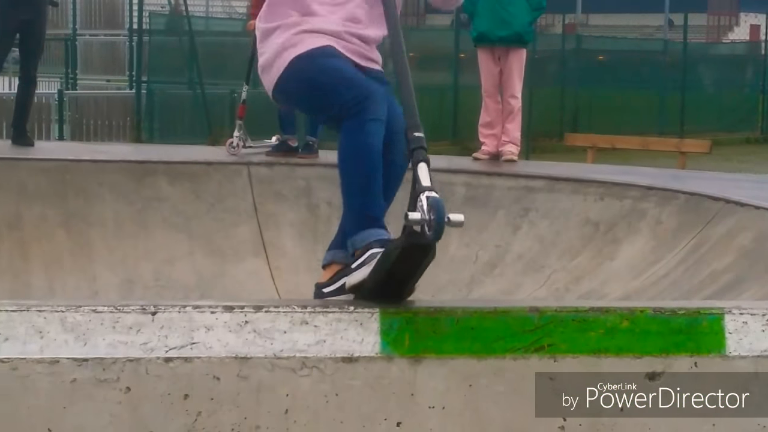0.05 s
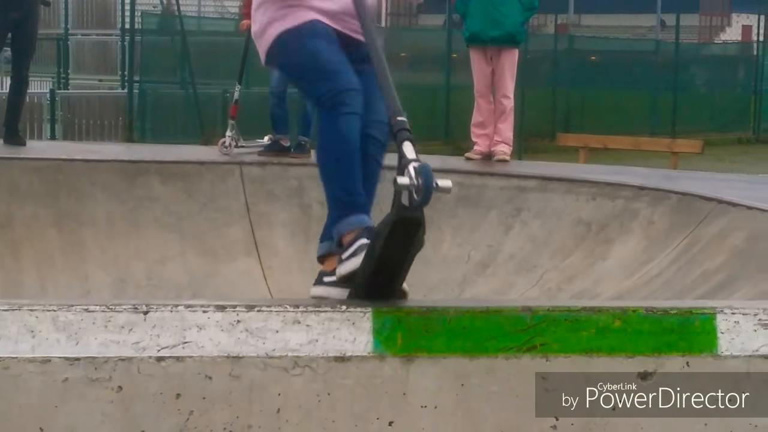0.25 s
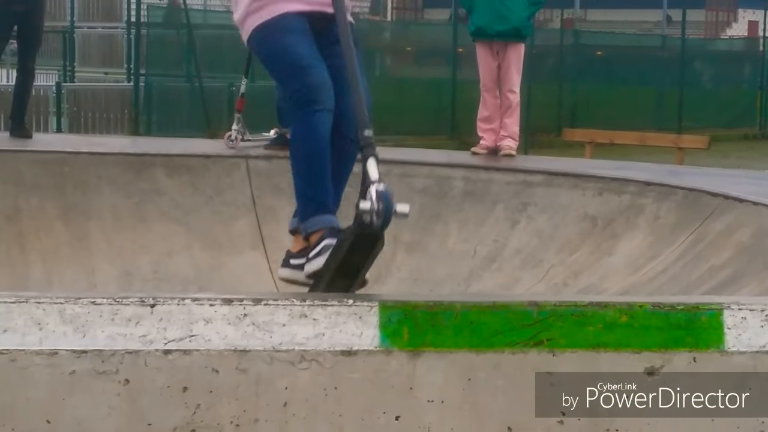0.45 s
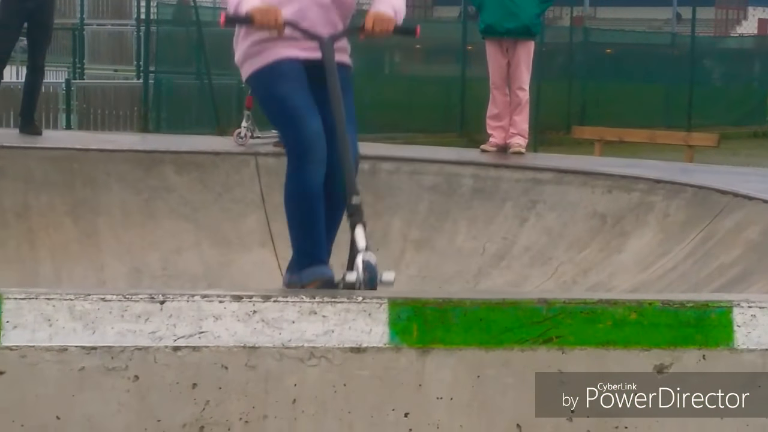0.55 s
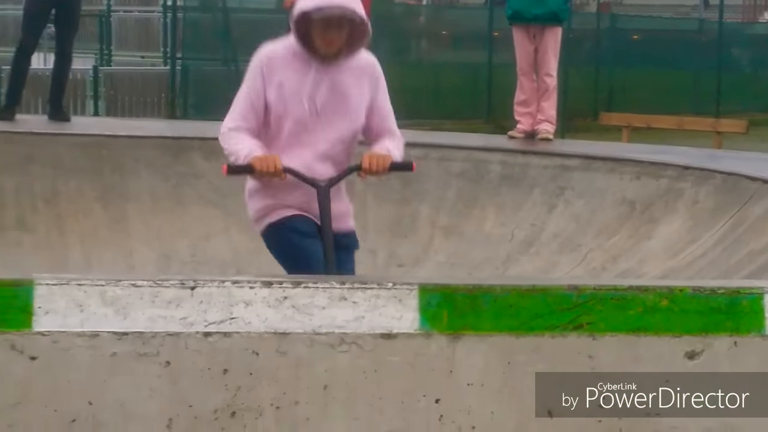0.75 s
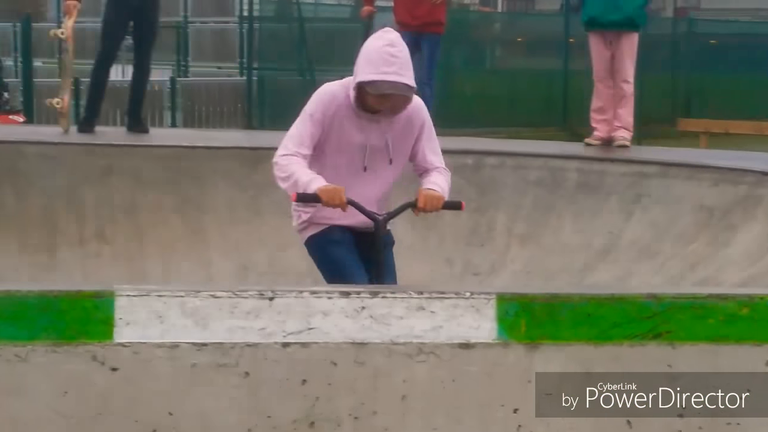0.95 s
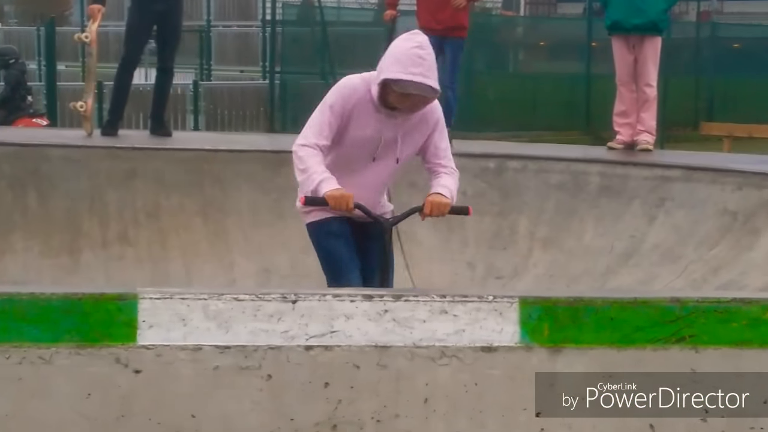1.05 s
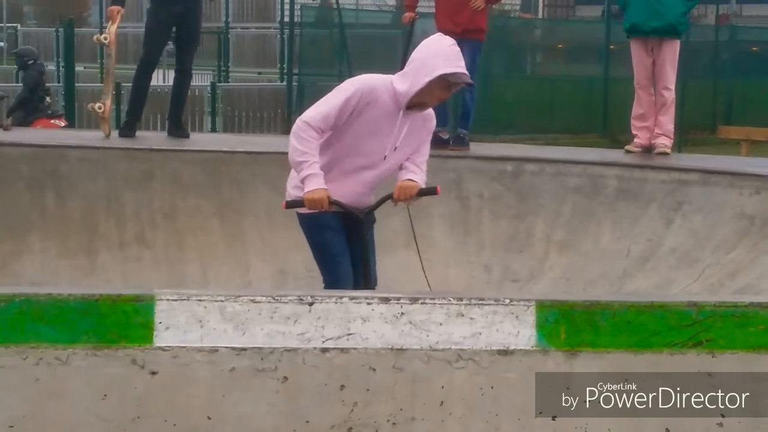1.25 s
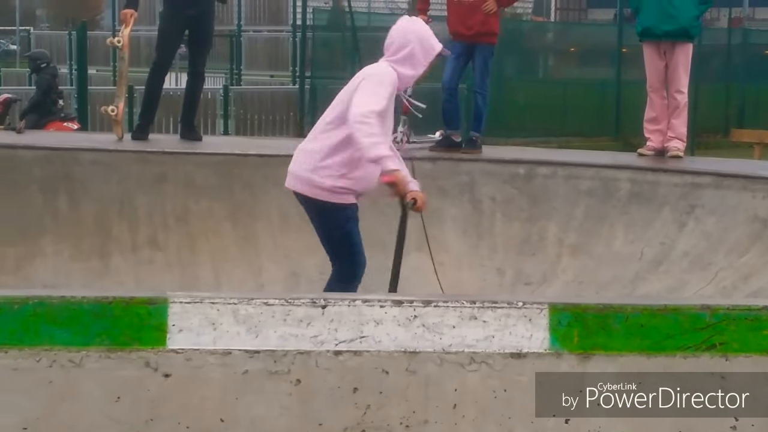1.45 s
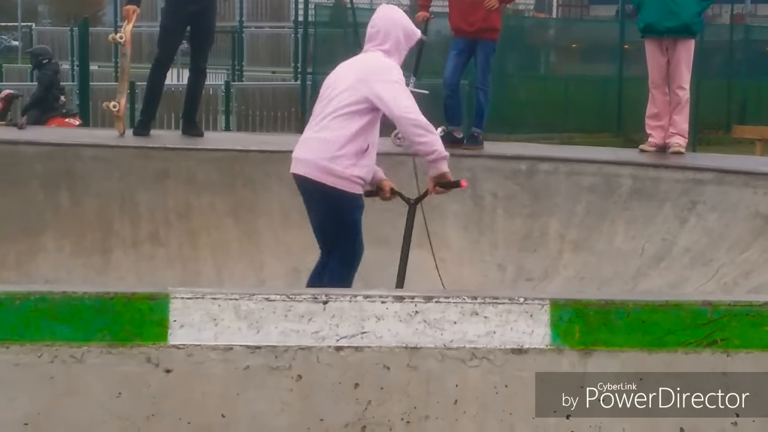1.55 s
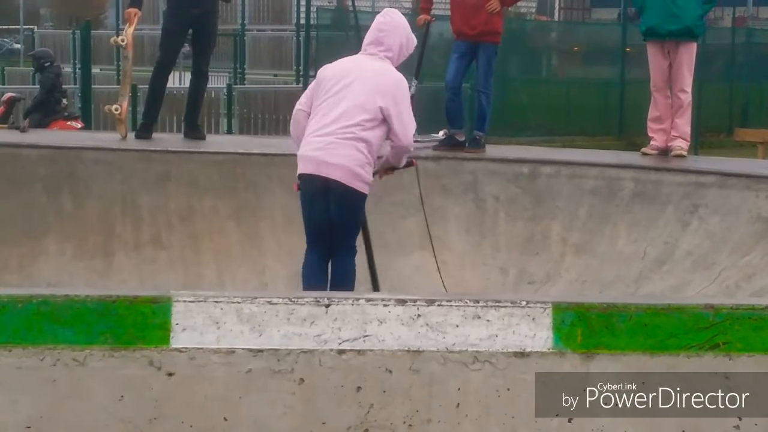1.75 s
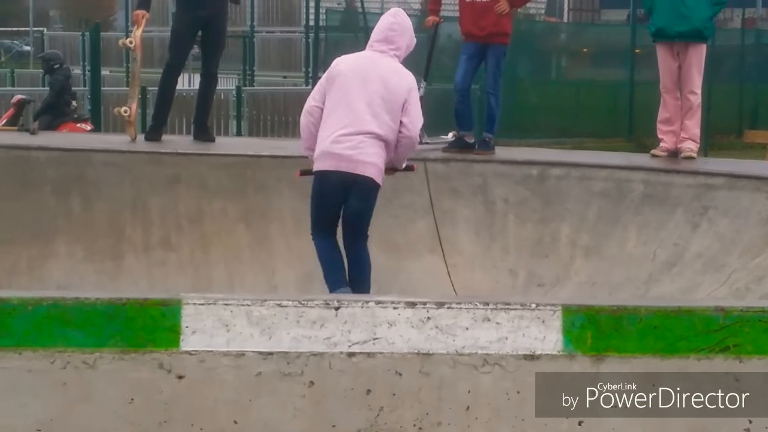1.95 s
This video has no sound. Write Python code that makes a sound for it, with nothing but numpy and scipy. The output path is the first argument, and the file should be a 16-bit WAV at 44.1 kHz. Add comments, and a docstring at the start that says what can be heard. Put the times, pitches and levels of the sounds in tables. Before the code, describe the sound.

One sharp metallic scooter landing on skatepark concrete, followed by faint rolling and lighter knocks.

```python
"""A stunt scooter slaps down on the concrete of a skatepark bowl: the deck clacks, then the front wheel.
Each blow makes the metal ring, thumps through the wheels and crunches on grit; the ramps throw it back.
The scooter rolls away, its hard wheels rumbling and hissing, with a few dull thuds, thin squeaks and
one last light clack. Faint outdoor noise lies under it all."""
import sys
import numpy as np
from scipy import signal
from scipy.fft import rfft, irfft
from scipy.io import wavfile

SR = 44100
rng = np.random.default_rng(int(sys.argv[2]) if len(sys.argv) > 2 else 0)


def generate_wav(sig):
    """Save sig (samples, or channels by samples) to the path in sys.argv[1] as 16-bit PCM at SR."""
    pcm = np.round(np.clip(np.atleast_2d(sig).T, -1, 1) * 32767).astype(np.int16)
    wavfile.write(sys.argv[1], SR, pcm)


N = 88200
T = np.arange(N) / SR

# the scooter hits concrete (a "fade" is the time a sound takes to fall by 60 dB):
# t/s, deck level/dB, fork level/dB, thump level/dB, crunch level/dB, crunch fade/s
BLOWS = [(0.2217, 4.5, -6.5, -22.5, -21.5, 0.16), (0.2946, -33, -12, -42.5, -20.5, 0.034),
         (0.349, -66.5, -62.5, -56.5, -36.5, 0.026), (0.9154, -74, -75, -53, -51, .09),
         (0.983, -64.5, -69, -65, -56, 0.093), (1.075, -54.5, -81, -89, -75, 0.044),
         (1.1461, -73.5, -73, -73, -45.5, 0.0054), (1.871, -52.5, -51.5, -72, -47.5, 0.025),
         (1.8903, -65.5, -77, -45.5, -31.5, 0.024)]


def from_db(db):
    """Turn decibels into a number to multiply by."""
    return 10 ** (np.asarray(db) / 20)


def unit_level(x):
    """Scale a sound to an average (rms) strength of 1."""
    return x / np.sqrt(np.mean(x ** 2) + 1e-20)


def coloured(x, curve):
    """Turn pitches up or down along a curve of f/Hz, level/dB."""
    hz, db = np.transpose(curve)
    size = 2 * N
    freqs = np.fft.rfftfreq(size, 1 / SR)
    gain = from_db(np.interp(np.log(freqs + 1e-9), np.log(hz), db))
    # fold the filter forward in time so that nothing sounds early
    folded = irfft(np.log(gain))
    folded[1:N] *= 2
    folded[N + 1:] = 0
    return irfft(rfft(x, size) * np.exp(rfft(folded)))[..., :N]


def low_pass(x, hz):
    """Gently cut the treble."""
    return signal.sosfilt(signal.butter(2, min(hz, SR / 2 - 100), fs=SR, output="sos"), x + 1e-18)


def high_pass(x, hz):
    """Gently cut the bass."""
    return signal.sosfilt(signal.butter(2, hz, "high", fs=SR, output="sos"), x + 1e-18)


def delayed(x, seconds):
    """The same sound, a little later."""
    freqs = np.fft.rfftfreq(2 * N, 1 / SR)
    return irfft(rfft(x, 2 * N) * np.exp(-2j * np.pi * freqs * seconds))[:N]


def rising(start, rise):
    """A loudness curve that builds up from 0 to 1."""
    return 1 - np.exp(-np.maximum(T - start, 0) / rise)


def dying(start, fade):
    """A loudness curve that jumps to 1, then falls 60 dB in `fade` seconds."""
    return (T >= start) * np.exp(-np.log(1000) * np.maximum(T - start, 0) / fade)


def drift(hz):
    """A random wobble of about 1 up or down, mostly slower than `hz`."""
    return unit_level(low_pass(rng.standard_normal(N + SR), hz)[SR:])


def stereo_noise(curve, alike):
    """Shaped noise; `alike`, from 0 to 1, is how much both ears share."""
    mid, side = rng.standard_normal((2, N))
    pair = np.sqrt(1 + alike) * mid + np.sqrt(1 - alike) * np.array([side, -side])
    return unit_level(coloured(pair, curve))


def struck(tones, times, levels_db):
    """Each knock sets a part's own tones ringing; neighbouring tones swing opposite ways."""
    knocks = np.zeros(N)
    knocks[(times * SR).astype(int)] = from_db(levels_db)
    ring = sum((-1) ** k * from_db(db) * np.sin(2 * np.pi * hz * T) * dying(0, fade)
               for k, (hz, db, fade) in enumerate(tones))
    return signal.fftconvolve(knocks, ring)[:N]


def open_air():
    """A faint, steady outdoor hush."""
    # tone of the hush: f/Hz, level/dB
    hush = [(100, -0.5), (400, -4.5), (700, -9), (1200, -2.5), (2500, -16), (6000, -18.5), (15000, -33)]
    return from_db(-76) * stereo_noise(hush, alike=0.4)


def park_echo(x):
    """The bowl scatters the sound, a long faint tail follows, and far walls send a late echo."""
    # washes of echo: delay/s, build-up/s, fade/s, level/dB, bass edge/Hz, treble edge/Hz
    washes = [(.006, 0.0015, 0.25, -15.5, 60, 15000), (0.029, 0.11, 1.4, -31.5, 1600, 2301),
              (0.168, 0.1, 0.27, -29, 1480, 2720)]
    echo = 0
    for delay, rise, fade, db, bass_hz, treble_hz in washes:
        shape = dying(delay, fade) * rising(delay, rise)
        scatter = rng.standard_normal((2, N)) * shape / np.linalg.norm(shape)
        dulled = low_pass(low_pass(scatter, treble_hz), treble_hz)
        echo = echo + from_db(db) * high_pass(high_pass(dulled, bass_hz), bass_hz)
    return signal.fftconvolve(x[None], echo, axes=1)[:, :N]


def ramp_echoes(x):
    """The ramps throw back quick, duller copies that weaken as the scooter rolls away."""
    # bounces off the ramps: delay/s, level/dB
    bounces = [(.00862, -16), (.01637, -8), (.02329, -14), (.0365, -29), (.0427, -23)]
    since_landing = np.maximum(T - BLOWS[0][0], 0)
    weakened = x * from_db(-5 * since_landing)  # 5 dB a second
    return low_pass(sum(from_db(db) * delayed(weakened, delay) for delay, db in bounces), hz=1900)


def rolling():
    """Hard wheels rumble and hiss unevenly over the concrete."""
    # loudness along the ride: t/s, rumble level/dB, hiss level/dB
    ride = [(0, -53.5, -64), (.2, -59.5, -66.5), (.45, -63.5, -69.5), (0.621, -66, -76), (0.848, -68, -78),
            (.96, -60.5, -72), (1.17, -68.5, -75.5), (1.349, -64, -70), (1.72, -59.5, -67.5),
            (1.85, -53, -64.5), (2, -56, -61.5)]
    # tone of the rumble: f/Hz, level/dB
    rumble_tone = [(20, -13), (45, -2), (120, -2), (200, -5), (350, -9.5), (500, -12.5), (900, -32),
                   (2000, -51)]
    # tone of the hiss: f/Hz, level/dB
    hiss_tone = [(300, -26.5), (600, -8), (950, -4), (1300, -6), (2400, -9), (3300, -8), (4500, -9.5),
                 (6200, -7.5), (8000, -13.5), (15000, -21)]
    times, rumble_db, hiss_db = np.transpose(ride)
    rumble_trim_db, hiss_trim_db, flicker_db = -3.5, 4, 1.5
    rumble = from_db(rumble_trim_db + np.interp(T, times, rumble_db) + flicker_db * drift(38))
    hiss = from_db(hiss_trim_db + np.interp(T, times, hiss_db) + flicker_db / 2 * drift(60))
    return rumble * stereo_noise(rumble_tone, alike=0.8) + hiss * stereo_noise(hiss_tone, alike=0.3)


def squeaks():
    """Thin whistles slide in pitch and tremble as they swell and fade."""
    # squeaks: t/s, length/s, start f/Hz, end f/Hz, level/dB, pitch wobble/Hz
    whistles = [(0.002, 0.075, 3840, 3940, -55.5, 70), (0.159, 0.087, 3730, 4100, -58, 80),
                (0.373, 0.039, 4000, 3970, -55.5, 109), (0.658, 0.031, 3044, 2930, -70, 115),
                (0.967, 0.21, 4500, 4480, -66.5, 150), (1.256, 0.043, 8760, 8380, -69, 220),
                (1.567, 0.035, 5700, 5780, -66.5, 120)]
    tremble_db = 3
    out = np.zeros(N)
    for start, length, start_hz, end_hz, db, wobble_hz in whistles:
        along = np.clip((T - start) / length, 0, 1)
        hz = start_hz + (end_hz - start_hz) * np.sin(np.pi / 2 * along) + wobble_hz * drift(250)
        loudness = from_db(db + tremble_db * drift(70)) * np.sin(np.pi * along)
        out += loudness * np.sin(2 * np.pi * np.cumsum(hz) / SR)
    return out


def thuds():
    """Wheels and feet bump softly: a few low swings with some dull grit."""
    # soft bumps: t/s, level/dB, f/Hz
    bumps = [(0.554, -51, 141), (0.670, -55.5, 87.9), (0.912, -39.5, 148), (0.914, -42.5, 352),
             (0.9216, -33.5, 252.3), (0.927, -45, 193), (0.949, -43, 260), (1.746, -55, 110),
             (1.806, -43.5, 235)]
    swings, grit_db = 10.6, -18
    out = np.zeros(N)
    for start, db, hz in bumps:
        grit = from_db(grit_db) * drift(hz)
        tone = np.sin(2 * np.pi * hz * (T - start))
        out += from_db(db) * dying(start, swings / hz) * (grit - tone)
    return out


def wheel_taps():
    """A wheel taps down lightly and rings for a moment."""
    # light taps: t/s, level/dB
    taps = [(1.8891, -49.5), (1.8928, -38)]
    # the wheel's ring: f/Hz, level/dB, fade/s
    wheel = [(792, 1, 0.017), (1370, 6, 0.011), (1726, -1, 0.03), (2624, -8, 0.023)]
    return struck(wheel, *np.transpose(taps))


def small_parts():
    """The steering tube, a loose clamp and the spring brake add thin, bright rings."""
    # the hardest blow jolts the tube: t/s, level/dB
    jolts = [(0.2228, -12.5)]
    # the tube's ring: f/Hz, level/dB, fade/s
    tube = [(2764, 0, 0.031), (2940, -1.5, .018), (5330, -10, .05), (6350, -12.5, .04)]
    # the clamp rattles afterwards: t/s, level/dB
    rattles = [(0.3528, -40), (0.357, -43.5), (0.3641, -51)]
    # the clamp's ring: f/Hz, level/dB, fade/s
    clamp = [(2880, 0, .04), (3140, -3, .04), (3330, 5, 0.031)]
    # the brake pings on landing in the bowl: t/s, level/dB
    pings = [(0.9145, -54), (0.9215, -50)]
    # the brake's ring: f/Hz, level/dB, fade/s
    brake = [(2240, -5, 0.046), (4785, 1, 0.16), (6498, -10.5, 0.14)]
    return (struck(tube, *np.transpose(jolts))
            + struck(clamp, *np.transpose(rattles))
            + struck(brake, *np.transpose(pings)))


def metal():
    """The deck (the footboard) and the fork ring at each blow; small parts give off little bass."""
    # the deck's ring: f/Hz, level/dB, fade/s
    deck = [(1036, -9, .03), (1157, 0, .027), (1280, -1.5, .022), (1510, -7.5, .026)]
    # the fork's ring: f/Hz, level/dB, fade/s
    fork = [(1637, 1, .028), (1747, -1.5, 0.045), (1930, -4.5, 0.03), (2172, -10, 0.026), (3206, -6, .016),
            (4540, -3, .016)]
    times, deck_db, fork_db = np.transpose(BLOWS)[:3]
    lead_s = 0.0012  # the deck bends just before the contact turns hard
    deck_ring = struck(deck, times - lead_s, deck_db)
    bright_ring = struck(fork, times, fork_db) + small_parts()
    return high_pass(deck_ring, hz=420) + high_pass(bright_ring, hz=1700)


def clacks():
    """Each blow rings the metal, thumps through the wheels and crunches on the grit."""
    # the low thump: f/Hz, level/dB, fade/s
    thump = [(88, -13, .13), (133.73, -9.5, .14), (254, -4.5, 0.11), (370, -3.5, 0.076), (422, -6, 0.051),
             (525.6, -6.5, .07)]
    # tone of the grit: f/Hz, level/dB
    grit = [(300, -6.5), (650, -8.5), (950, -1), (1800, 1), (2500, 3), (4500, -2.5), (6500, -2.5),
            (8000, -14.5), (11000, -20.5), (16000, -26.5)]
    times, _, _, thump_db, crunch_db, crunch_fades = np.transpose(BLOWS)
    bursts = sum(from_db(db) * dying(start, fade) * rising(start, rise=0.00035)
                 for start, db, fade in zip(times, crunch_db, crunch_fades))
    crunch = bursts * unit_level(coloured(rng.standard_normal(N), grit))
    return metal() + struck(thump, times, thump_db) + crunch


def scene():
    """The scooter crosses the echoing bowl from left to right, in the open air."""
    # the crossing: t/s, delay at the right microphone/s
    crossing = [(.9, .00007), (1.9, -.00009)]
    # the right microphone faces away from the scooter and gets less treble: f/Hz, level/dB
    shade = [(1600, 0), (4500, -4.5), (7000, -4)]
    clack = clacks() + wheel_taps()
    left = clack + ramp_echoes(clack) + thuds()
    right_delay = np.interp(T, *np.transpose(crossing))
    right = coloured(np.interp(T - right_delay, T, left), shade)
    scooter = from_db(-3) * (np.array([left, right]) + park_echo(clack))
    return scooter + rolling() + squeaks() + open_air()


def record(dry):
    """Two unequal microphones lose the deepest bass and highest treble; the loudest clack overloads."""
    # the right microphone hears everything fuller and duller: f/Hz, level/dB
    right_tone = [(100, 3), (1200, 4.5), (2300, 3.5), (3200, -5), (4600, -13), (7500, -11.5), (10500, -3),
                  (14000, -0.5)]
    overload, top_hz = 0.94, 15500
    heard = high_pass(np.array([dry[0], coloured(dry[1], right_tone)]), hz=30)
    clipped = np.clip(heard, -overload, overload)
    return signal.sosfilt(signal.ellip(10, .1, 80, top_hz, fs=SR, output="sos"), clipped)


dry = scene()
out = record(dry)
generate_wav(out)
```